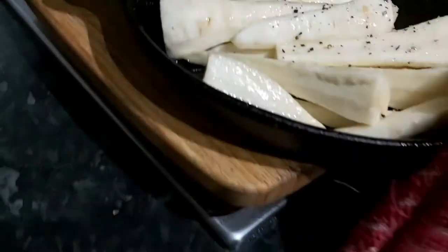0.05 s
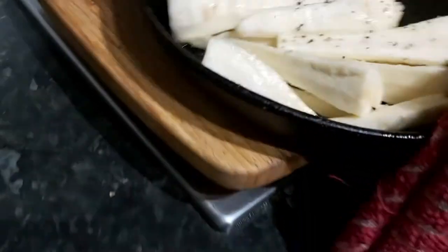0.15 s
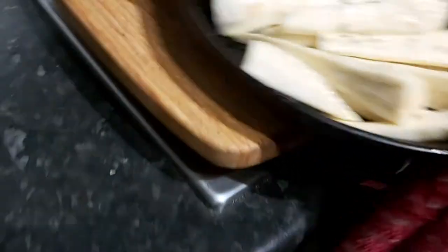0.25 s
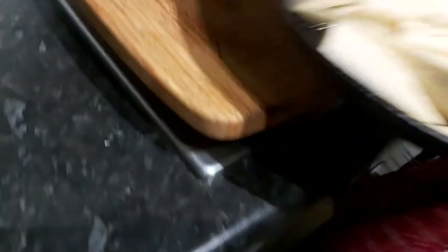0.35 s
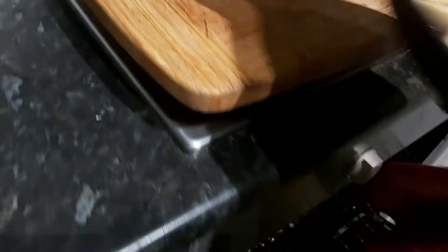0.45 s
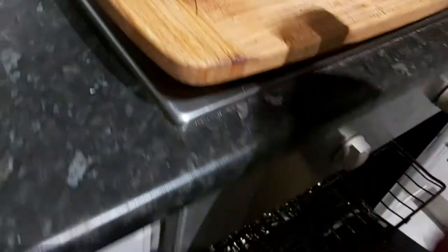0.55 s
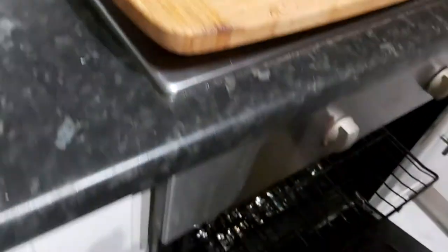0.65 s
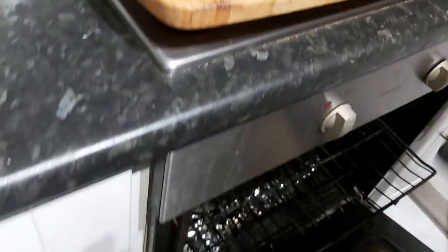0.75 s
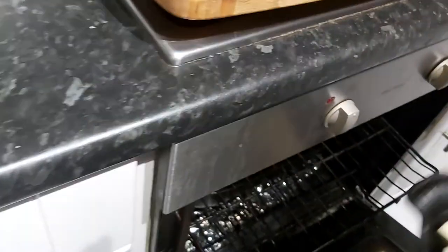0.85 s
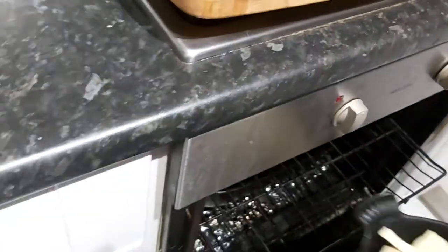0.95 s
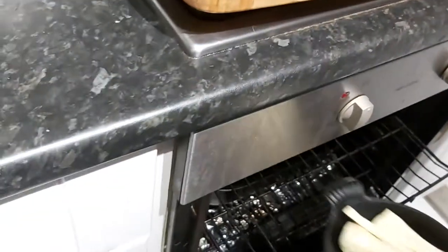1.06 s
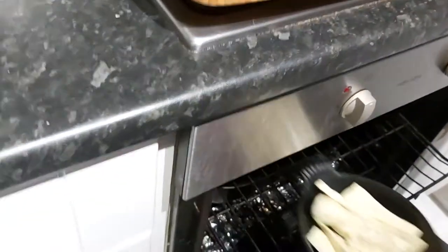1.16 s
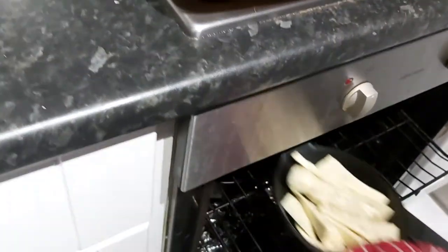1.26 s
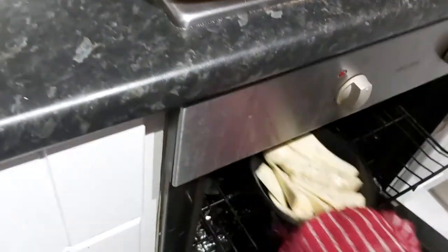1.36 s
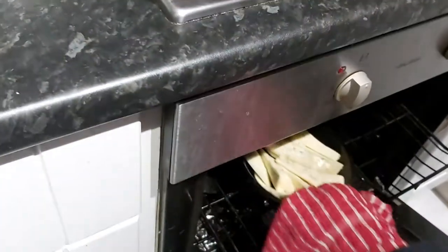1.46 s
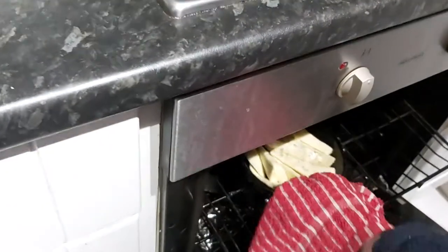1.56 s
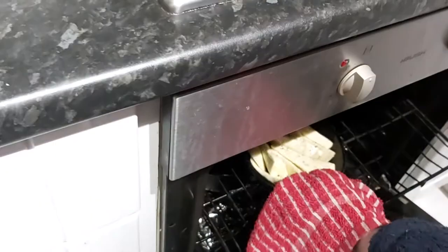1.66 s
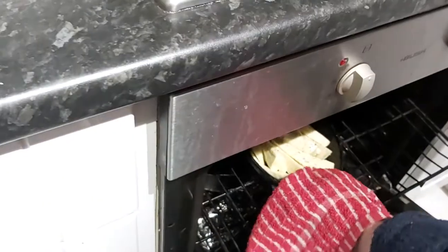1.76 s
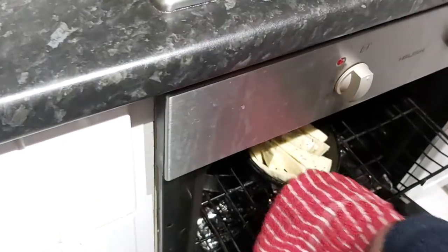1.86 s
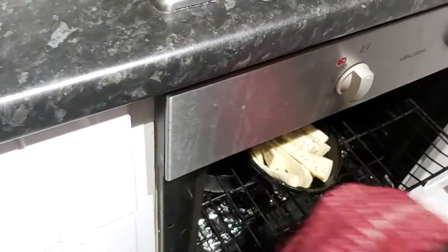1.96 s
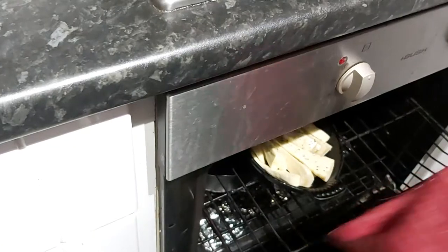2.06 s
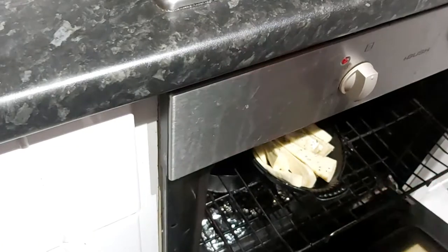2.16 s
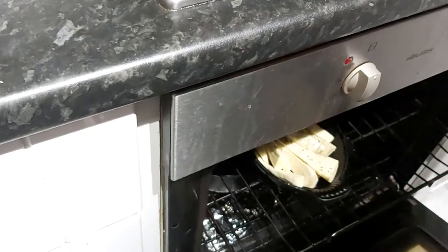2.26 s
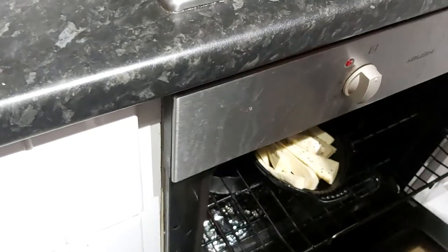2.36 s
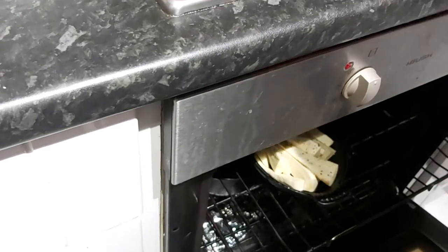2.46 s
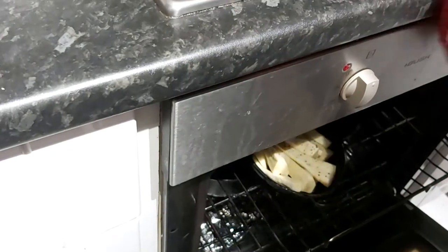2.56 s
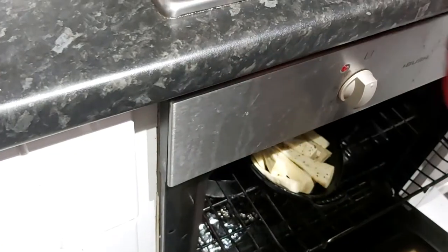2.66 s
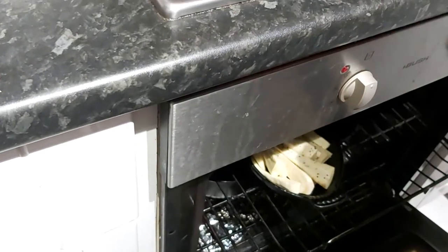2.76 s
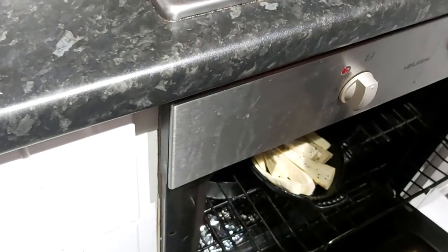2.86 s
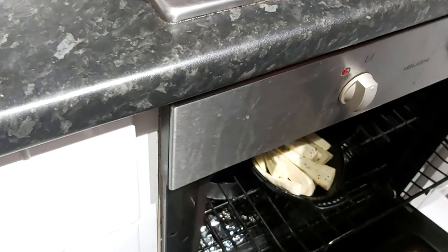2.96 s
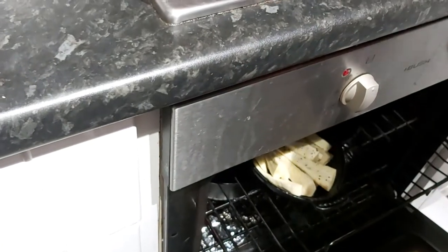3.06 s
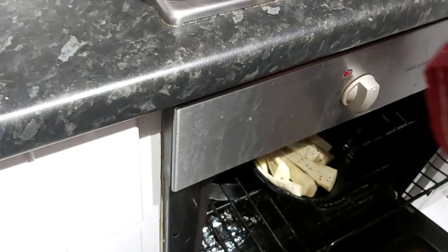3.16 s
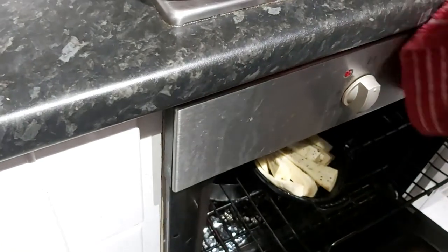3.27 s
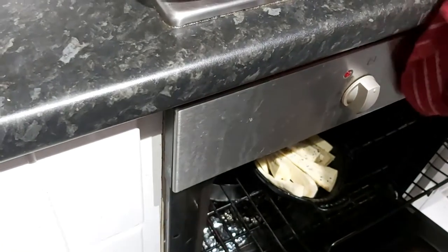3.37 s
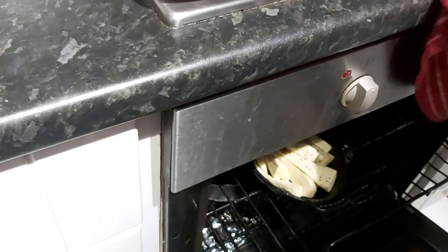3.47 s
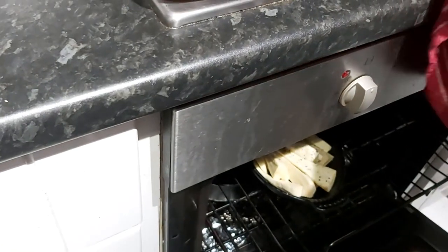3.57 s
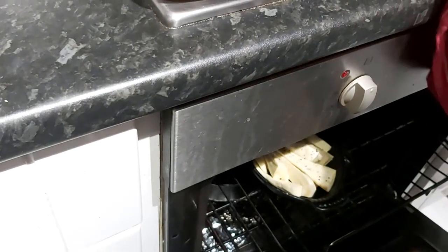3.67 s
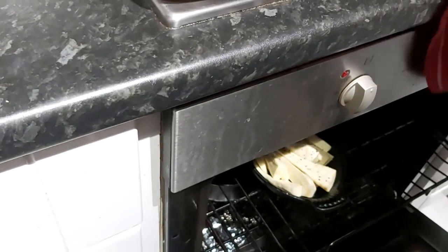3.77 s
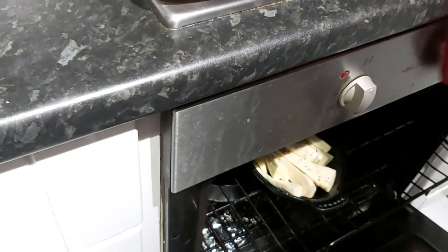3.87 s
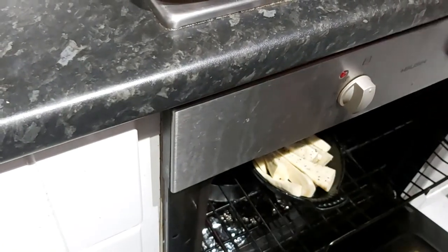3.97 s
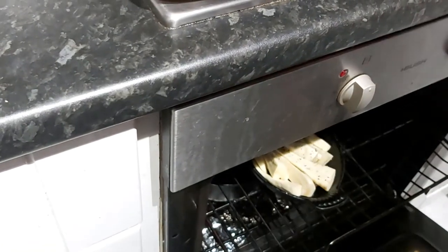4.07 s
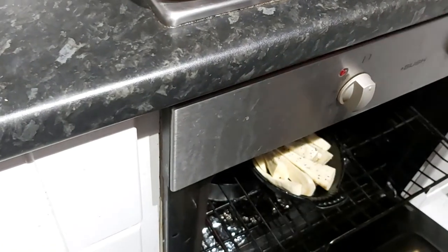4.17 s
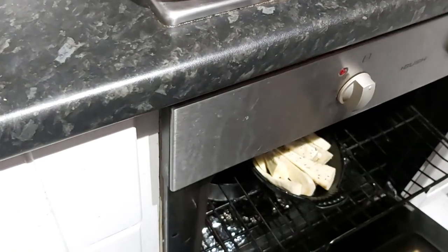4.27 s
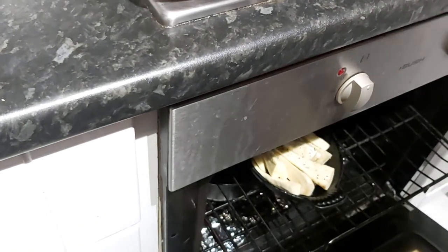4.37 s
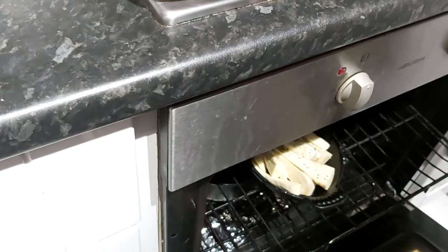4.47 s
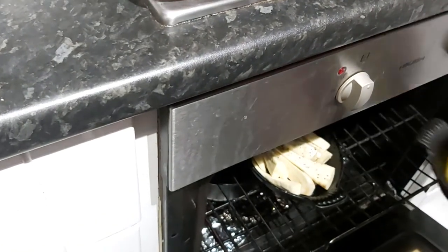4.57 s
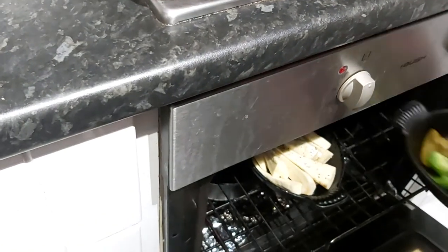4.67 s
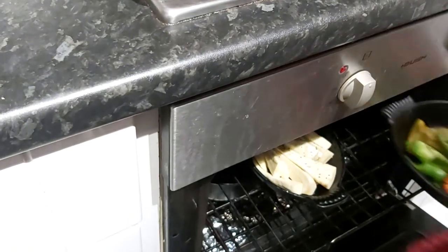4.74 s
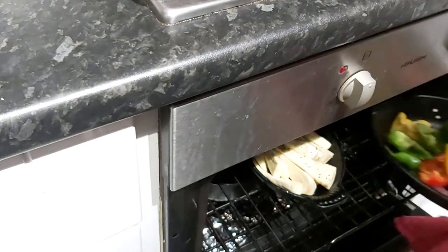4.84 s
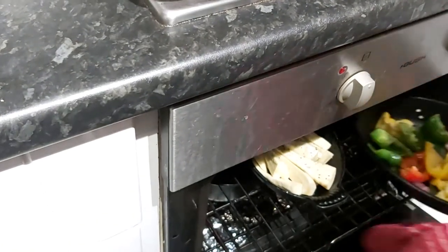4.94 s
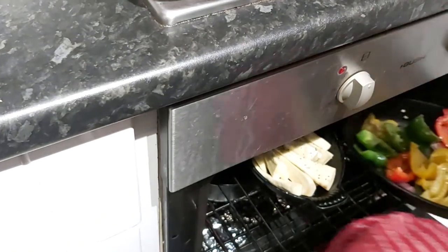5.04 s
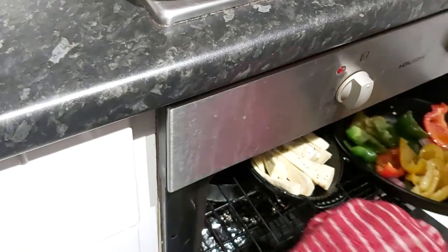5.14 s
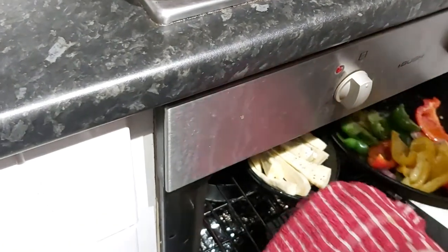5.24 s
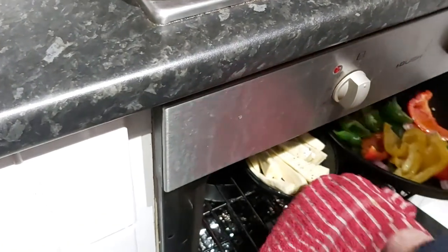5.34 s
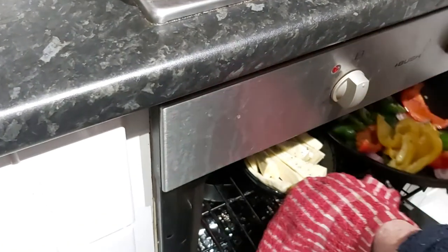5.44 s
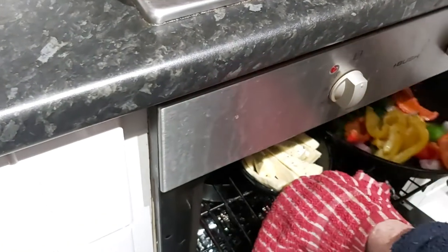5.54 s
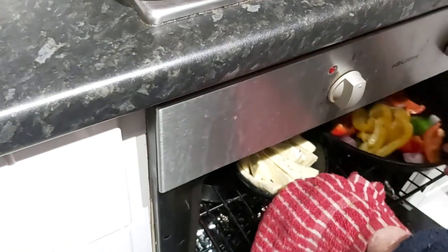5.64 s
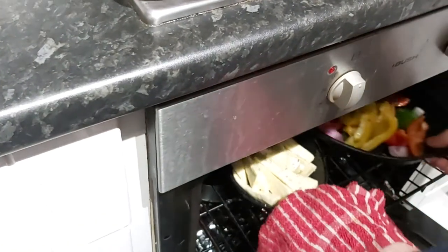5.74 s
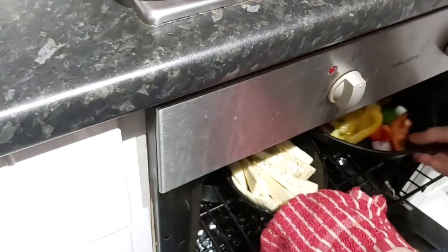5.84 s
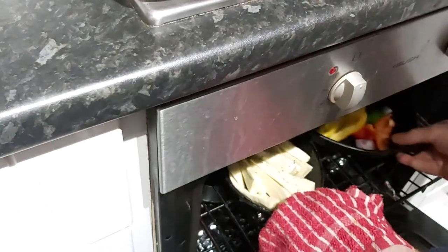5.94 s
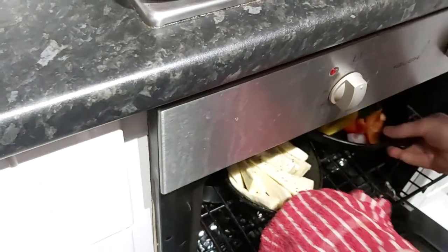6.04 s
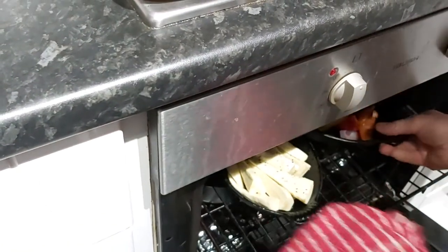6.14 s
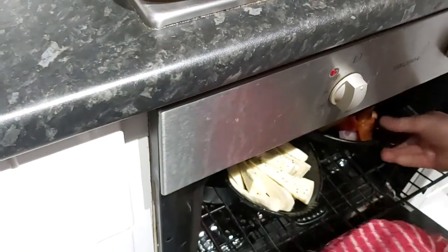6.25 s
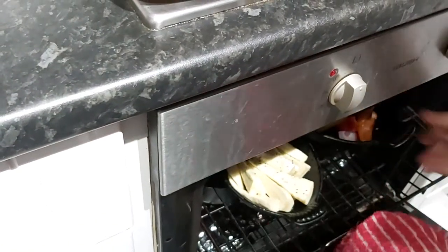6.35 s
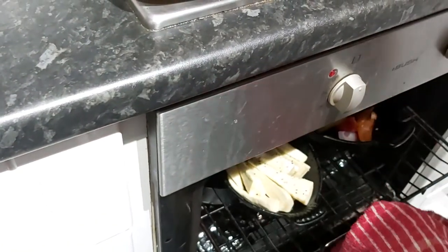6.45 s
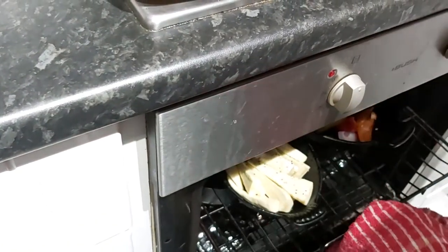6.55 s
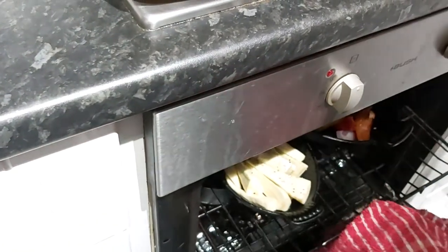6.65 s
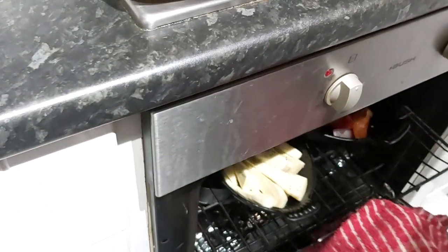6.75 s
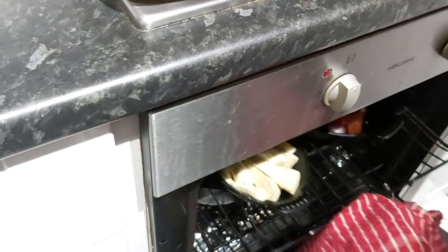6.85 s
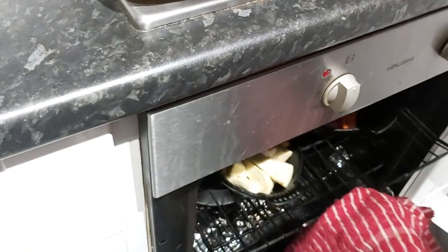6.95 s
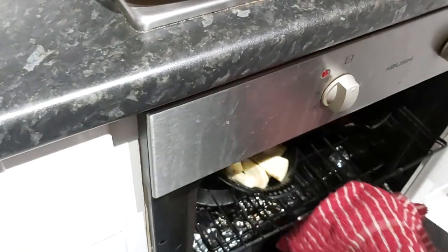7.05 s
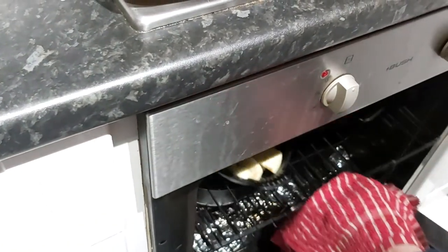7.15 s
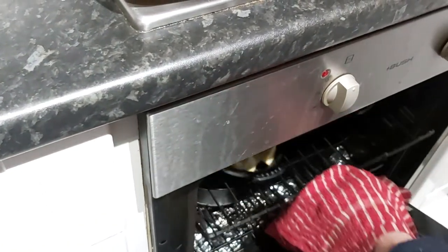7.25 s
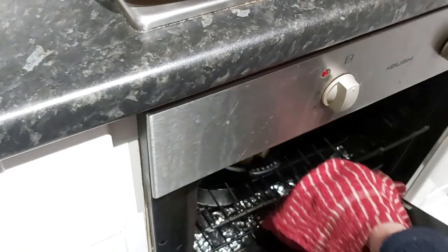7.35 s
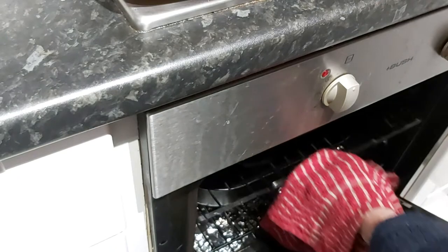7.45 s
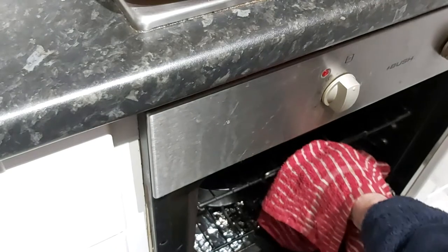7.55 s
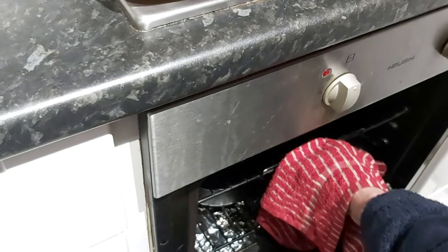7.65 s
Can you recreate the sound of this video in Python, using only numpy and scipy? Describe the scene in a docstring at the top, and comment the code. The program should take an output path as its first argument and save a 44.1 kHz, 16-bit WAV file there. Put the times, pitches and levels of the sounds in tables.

```python
"""A quiet kitchen hums while a pan stirs faintly on a wooden board; then iron pans slide onto a wire oven rack.
Rough noise and struck modes make the wires scrape, chatter and clank; the rack booms and some wires ring on.
Between them a second pan is dragged off the board, which drops back: noise through wood and panel modes.
A tea towel rustles as coloured noise; at the end the rack is pushed home against the oven wall."""
import sys
import numpy as np
from scipy import signal
from scipy.fft import rfft, irfft, next_fast_len
from scipy.io import wavfile
from scipy.ndimage import uniform_filter1d, map_coordinates

SR = 44100
rng = np.random.default_rng(int(sys.argv[2]) if len(sys.argv) > 2 else 0)


def dump(signal):
    """Clip the signal to [-1, 1] and save it as 16-bit WAV at the path in sys.argv[1]."""
    limited = np.clip(np.atleast_2d(signal).T, -1, 1)
    pcm = np.round(limited * 32767).astype(np.int16)
    wavfile.write(sys.argv[1], SR, pcm)


N = 339922

# Levels in dB are relative: each source adds its own offset.

# Kitchen hum and microphone hiss over time [time_s, hum_db, hiss_db]
HUM_LEVELS = [(0.0, -53.5, -77), (7.71, -67, -80)]
# Hum spectrum [freq_hz, gain_db]
HUM_COLOUR = [(18, -39), (30, 0.5), (58, -5), (70, -28.5), (86, -5), (108, -7.5), (168, -23.5), (247, -2),
              (266, -23.5), (303, -9.5), (415, -17), (672, -19), (794, -25.5), (1570, -34.5), (2500, -39),
              (3250, -54.5), (5500, -120)]
# Wavering tones of the hum [freq_hz, width_hz, gain_db]
DRONE_MODES = [(222, 11, -7), (247, 7, -1), (296, 5.4, -2.5)]
DRONE_DB = -6.5
# Hiss spectrum [freq_hz, gain_db]
HISS_COLOUR = [(880, -33.5), (1500, -5.5), (3180, -10), (3380, -9), (4120, -9), (7240, -1.5), (9370, -12.5),
               (13300, -13.5), (16000, -13.5)]
# Decay of the room's answer [freq_hz, t60_s]
KITCHEN_DECAY = [(150, 0.5), (1000, 0.3), (10000, 0.083)]

# Towel spectrum, also used for the rattle of thumps [freq_hz, gain_db]
CLOTH_COLOUR = [(1470, -27.5), (2500, 1.5), (4550, 0), (7470, -1.5), (8600, -5.5), (11900, -6),
                (15200, -10), (16000, -16)]
# Towel moving alone; the sharp one at 3.247 s is the rattle just after the board knocks
# [start_s, rise_s, hold_s, level_db]
RUSTLES = [(0.094, 0.036, 0.023, -67.5), (3.247, 0.0066, .04, -34.5), (3.378, 0.042, 0.24, -61.5),
           (3.597, 0.088, 0.15, -59)]
GRIP_DB, CLOTH_T60_S = -20, 0.24  # towel round the handle, against the rub
# One quick brush of cloth [start_s, rise_s, hold_s, level_db]
BRUSH_STROKE = (.69, .07, .115, -57)
BRUSH_T60_S = 0.17
# Brush spectrum [freq_hz, gain_db]
BRUSH_COLOUR = [(1760, -46), (3000, -20), (3310, -11.5), (7460, -1), (12300, -7), (16000, -11)]

# Pans moved on the board [start_s, rise_s, hold_s, rub_db, hob_panels_db, worktop_rumble_db]
RUBS = [(0, 0.00088, 0.02, -46, -41, -37.5), (0.057, 0.013, 0.11, -55.5, -47, -75),
        (0.199, 0.033, 0.0091, -45, -42, -61), (0.397, 0.1, 0.055, -76, -48, -64),
        (.58, 0.016, 0.044, -47.5, -52, -68), (0.735, 0.074, 0.1, -66.5, -48.5, -57),
        (1.0, 0.027, 0.18, -65.5, -60.5, -70), (1.437, 0.071, 0.085, -55, -62, -66.5),
        (2.844, .14, 0.12, -37, -41, -53.5), (2.978, 0.14, 0.096, -31.5, -41, -39.5),
        (3.277, 0.013, 0.025, -27.5, -37, -37), (3.517, 0.1, 0.033, -50, -51, -44.5),
        (3.617, 0.053, 0.22, -63.5, -57.5, -75.5)]
RUB_T60_S, HOB_T60_S, WORKTOP_T60_S = 0.25, 0.32, 0.44
# Iron on wood, distinct modes [freq_hz, width_hz, gain_db]
RUB_MODES = [(221, 230, -3), (610, 160, 2.5), (805, 17, -1), (1070, 49, -5.5), (1384, 64, -9.5),
             (1803, 93, -14.5), (2250, 180, -15.5), (2270, 35, -17.5), (2760, 40, -15.5), (3130, 47, -25.5),
             (3390, 19, -29)]
# Iron on wood, broad spectrum [freq_hz, gain_db]
RUB_COLOUR = [(180, -40), (300, -11.5), (453, -10.5), (547, -8.5), (997, -9), (1350, -11), (1520, -15),
              (2140, -18), (5000, -32.5), (6500, -71), (11000, -120)]
# Panels under the board [freq_hz, width_hz, gain_db]
HOB_MODES = [(177, 41, -10), (222.4, 15, 3.5), (313, 22, -2.5)]
# Worktop rumble [freq_hz, width_hz, gain_db]
WORKTOP_MODES = [(53, 47, -2.5), (95.5, 20, 1), (125, 14, -8)]
# Board knocking the hob; thumps() scales t60 per part [start_s, level_db, hollow_db, rattle_db, t60_s]
KNOCKS = [(0.143, -51, 1, -11, 0.15), (0.25, -39.5, -14, -36.5, 0.14), (0.591, -37, -29, -19, 0.3),
          (1.468, -49, -13, -28, 0.25), (1.496, -45, -12.5, -37, 0.18), (1.545, -45, -11.5, -30, .2),
          (3.2305, 3.5, -22.5, -39.5, 0.17), (3.252, -9, -7.5, -13.5, 0.23), (3.282, -16, 6, -16.5, 0.15),
          (3.31, -28.5, -0.5, -14, .2), (4.179, -61, -16, -9, 0.48)]
# Board plate [freq_hz, width_hz, gain_db]
BOARD_MODES = [(527, 85, -2), (618, 51, -10), (885, 45, -7.5), (1154, 26, -6), (1556, 20, -18.5),
               (2075, 45, -13), (2330, 25, -20.5), (2800, 28, -30.5)]
# Hollow under the board [freq_hz, width_hz, gain_db]
HOLLOW_MODES = [(127, 9, -2), (174, 9.6, -9), (250, 20, -12), (302, 23, 0), (515, 8, -15)]

# Rack meeting the oven wall; thumps() scales t60 per part [start_s, level_db, hollow_db, rattle_db, t60_s]
STOPS = [(7.5465, -4.5, -4.5, -24, 0.092), (7.554, -7, -5, -23, 0.1), (7.561, -13, -11, -25, .12),
         (7.567, -11.5, -8, -24.5, .15), (7.588, -10.5, -5.5, -28, 0.13), (7.609, -18, -8.5, -21.5, 0.51)]
# Oven wall [freq_hz, width_hz, gain_db]
WALL_MODES = [(426, 40, 4.5), (520, 51, 2), (620, 120, -3), (800, 60, 1), (873, 35, -2), (1080, 67, -6),
              (1150, 4.9, -10), (1273, 37, -3.5), (1542, 85, -13.5), (1956, 67.4, -13.5), (2240, 45, -21.5),
              (2490, 28, -27), (2670, 15, -18.5)]
# Oven cavity [freq_hz, width_hz, gain_db]
CAVITY_MODES = [(121.7, 14, 2), (169.9, 39, 2.5), (215, 32, 0)]

# Iron catching and singing as it drags [start_s, length_s, first_hz, last_hz, level_db]
SQUEAKS = [(0.224, 0.038, 1780, 1810, -51), (2.963, 0.14, 1103, 1150, -33.5), (3.05, 0.15, 1350, 1396, -29),
           (3.12, 0.085, 530, 608, -27), (2.895, .1, 205, 198.7, -36), (2.95, 0.14, 3110, 3144, -52),
           (3.06, 0.091, 2090, 2206, -43.5), (3.12, .11, 2740, 2800, -45), (7.44, 0.076, 2013, 2000, -36.5)]
# Something loose ticking on the hob [start_s, level_db, pitch_hz]
PINGS = [(3.274, -11, 2080), (3.4244, -46, 1770), (3.457, -37, 1780), (3.486, -47, 1810)]

# Free wires that ring on [pitch_hz, level_db, t60_s]
FREE_WIRES = [(183, -9, 1.2), (240, 3, 1.8), (301, -5, 2.5), (431, 0, 1.4), (497, -8, 1.1), (651, -5, 2.4),
              (738, -10, 1.1), (925, -9, 1.4), (1290, -4, 2.6), (2148, -3, .9), (3130, -10, .6),
              (3176, -9, .9)]
# Blows that leave wires free to ring [start_s, level_db, tilt_db_per_octave]
FREEING_BLOWS = [(1.922, -39, 0), (6.071, -58, -6)]
DAMPED_S, DAMPING_T60_S = 2.84, 0.15  # the first ring is cut short
WAVER_DB, WAVERS_PER_S = 2.8, 30

# Rack dropping over a step in its runners [start_s, level_db, pitch_hz]
BOUNCES = [(1.703, -22, 98.5), (1.738, -14, 100), (1.745, -17.5, 126.5), (1.918, -26, 105),
           (1.921, -16, 128.7), (5.103, -31, 105), (5.699, -25.5, 105), (5.7, -33, 210.7),
           (5.757, -25.5, 104.3), (5.961, -26, 104), (6.957, -18, 99.3), (7.014, -24, 101.3),
           (7.11, -26.5, 96), (7.205, -22, 109.6), (7.238, -25.5, 106.3), (7.29, -26, 107.4),
           (7.423, -32.5, 102), (7.552, -15, 124), (7.602, -34, 122)]
BOUNCE_WIDTH_HZ = 8
# Rack bouncing on its runners [freq_hz, width_hz, gain_db]
BOOM_MODES = [(94, 17, 7.5), (131, 9.2, 7), (61.4, 27, -12.5)]
# Oven sheets [freq_hz, width_hz, gain_db]
PANEL_MODES = [(209, 19, 3.5), (253, 4.3, 2), (294.5, 8, -1.5), (351, 29, -7)]
# Dense overtones of the oven sheets [freq_hz, gain_db]
PANEL_COLOUR = [(300, -26.5), (400, -9.5), (900, -17.5), (1400, -27), (2200, -54), (4000, -79.5)]
BOOM_T60_S, PANELS_T60_S = 0.53, 0.5
LOAD_LAG_S = 0.036  # the weight arrives late: longer rise, shorter hold
PANELS_DB, CLANK_PANELS_DB = -0.5, -25.5  # panels against the load; panels against a clank

# Iron pushed along the wires [start_s, rise_s, hold_s, scrape_db, grit_db, rack_load_db]
PUSHES = [(1.621, 0.018, 0.12, -33.5, -50, -28), (1.739, 0.026, 0.22, -34.5, -62, -29),
          (2.008, 0.015, 0.17, -40.5, -64.5, -34), (2.296, .1, 0.43, -89, -89.5, -50),
          (5.059, 0.0123, 0.049, -27.5, -43.5, -30.5), (5.161, 0.015, 0.11, -29, -49.5, -36),
          (5.296, 0.025, 0.17, -36, -51.5, -36.5), (5.455, 0.089, 0.17, -44.5, -53, -43),
          (5.657, 0.085, 0.14, -36, -45, -32), (5.886, 0.027, 0.21, -40.5, -51, -35),
          (6.205, 0.21, 0.35, -84, -90.5, -62.5), (6.758, .17, 0.024, -54, -59.5, -40),
          (6.944, 0.018, 0.28, -48, -56.5, -44.5), (7.157, .03, 0.12, -44.5, -46, -48),
          (7.328, 0.035, 0.1, -46.5, -48, -45.5), (7.424, 0.063, 0.066, -38.5, -40.5, -35.5),
          (7.547, .015, 0.041, -32.5, -40, -25)]
RISE_DB, SCRAPE_T60_S = 19.5, 0.28  # every stroke swells from RISE_DB below its level
SLIPS_PER_S, SLIP_SIZE, SLIP_DECAY_S = 45, 1.2, 0.005  # mean size against the even scrape; time constant
# Wires damped by the pan [freq_hz, width_hz, gain_db]
WIRE_MODES = [(470, 59, -4), (852.7, 19, 3.5), (1100, 166, -1.5), (1480, 40, 0.5), (1747.5, 40, 1),
              (2089, 78, -5.5), (2316, 51, -4.5), (2484, 15, -0.5), (2645, 22, -3), (2890, 26, -8.5),
              (3280, 55, -12), (3500, 120, -12.5), (4080, 30, -9.5), (4430, 20, -7), (4800, 75, -14),
              (5420, 23, -11.5), (6350, 27, -16), (6770, 45, -18.5), (7300, 29, -14.5), (7820, 36, -12),
              (8400, 29, -23)]
# Wire modes too close to tell apart [freq_hz, gain_db]
WIRE_COLOUR = [(100, -41), (170, -15.5), (216, -10), (392, -13), (435, -2.5), (560, -7.5), (838, -12),
               (2450, -11.5), (6000, -30), (7800, -45), (13200, -120)]
# Grit spectrum [freq_hz, gain_db]
GRIT_COLOUR = [(1760, -31.5), (3000, -6.5), (5800, -8), (6900, -7), (8760, -9.5), (15100, -15.5),
               (16000, -29)]
# Pan striking a wire; bright parts shorten t60 [start_s, level_db, sharpness_db, chatter_t60_s]
CLANKS = [(1.6184, -23.5, -2.5, .2), (1.627, -18.5, -12.5, .2), (1.6992, -24, -19, .18),
          (1.737, -7.5, -7.5, .15), (1.745, -8.5, -11.5, .24), (1.8905, -10, -37.5, .2),
          (1.902, -12, -16.5, .15), (1.9192, -3, -4.5, 0.2), (2.045, -15.5, -17, .18),
          (2.125, -16.5, -10.5, .2), (2.2108, -26, -12.5, .2), (5.025, -63, 8, 0.21),
          (5.0625, -25.5, 4, .25), (5.107, -21.5, -12, .15), (5.125, -20, -24.5, .15),
          (5.1505, -13.5, -40, 0.185), (5.190, -10.5, -8, 0.13), (5.196, -12.5, -10, .24),
          (5.3278, -17, -20, 0.17), (5.3775, -16, -8, 0.189), (5.7352, -32, -16, 0.2),
          (5.954, -12.5, -14.5, 0.16), (6.066, -16.5, -30, 0.143), (6.765, -60.5, 4.5, 0.21),
          (6.91, -40, -22, 0.26), (6.948, -28, -32, .18), (7.191, -29.5, -1.5, 0.12),
          (7.2759, -34, 1.5, 0.19), (7.378, -35, 1.5, .18), (7.425, -26.5, -14.5, 0.17),
          (7.459, -35, -5, 0.16), (7.5026, -31, 5.5, .18)]
CLANK_PAN_DB, PAN_SCATTER_DB = -2.5, 3  # left against right
SHEEN_HZ, SHEEN_GROWS, SHEEN_DB = 8200, 0.84, -1  # top treble follows sharpness by 1 + SHEEN_GROWS
CLANG_LOW_HZ, CLANG_HIGH_HZ, CLANG_WIDTH_HZ = 703.5, 9080, 28  # chance modes of each clank
CLANG_DB, CLANG_TILT_DB_PER_OCTAVE = -12, -0.5
CLANG_FOLLOWS = 0.46  # share of the sharpness

# Difference of the channels against their sum [freq_hz, gain_db]
SIDE_GAIN = [(60, -14.5), (130, -18.5), (250, -12), (500, -6), (1000, -2), (4000, 0), (15000, 0)]
# Left channel against right [freq_hz, difference_db]
LEAN = [(100, -1), (400, -2.5), (2000, -1), (6000, 2.5), (10000, -5)]
TOP_HZ = 15900


def amp(db):
    """Decibels to amplitude."""
    return 10 ** (np.asarray(db) / 20)


def unit(x):
    """Scale to rms 1."""
    return x / np.sqrt(np.mean(x ** 2) + 1e-20)


def along(points, hz):
    """Interpolate (Hz, value) points on a log-frequency axis."""
    f, v = np.transpose(points)
    return np.interp(np.log(hz + 1), np.log(f + 1), v)


def left_right(db):
    """Channel gains for a left-against-right difference."""
    return amp([[db / 2], [-db / 2]])


def gains(points):
    """One gain per sample for each dB column, linear in dB between points."""
    t = np.arange(N) / SR
    times, *columns = np.transpose(points)
    return [amp(np.interp(t, times, db, -150, -150)) for db in columns]


def wobble(rate, channels=1):
    """Smooth random curves through `rate` knots a second."""
    steps = np.arange(0, N + 32, 32)
    knots = rng.standard_normal((channels, int(N * rate / SR) + 4))
    curves = [map_coordinates(k, [steps * rate / SR]) for k in knots]
    return np.array([np.interp(np.arange(N), steps, curve) for curve in curves])


def filtered(x, response):
    """Apply a complex response of frequency."""
    size = next_fast_len(N + SR // 2)
    spectrum = rfft(x, size) * response(np.fft.rfftfreq(size, 1 / SR))
    return irfft(spectrum, size)[..., :N]


def modes(table):
    """Causal response of parallel resonances with alternating signs."""
    def response(f):
        total = 0
        for k, (centre, width, db) in enumerate(table):
            damping = 1j * f * width
            total = total + (-1) ** k * amp(db) * damping / (centre ** 2 - f ** 2 + damping)
        return total
    return response


def colour(points):
    """Minimum-phase response with the given gains, by folding the cepstrum."""
    def response(f):
        cepstrum = irfft(np.log(amp(along(points, f))))
        cepstrum[1:len(f) - 1] *= 2
        return np.exp(rfft(cepstrum[:len(f) - 1], 2 * len(f) - 2))
    return response


def above(hz):
    """Soft step from 0 to 1 round a frequency."""
    return lambda f: 1 / (1 + (hz / (f + 1)) ** 16)


def rough(rough_db, rate):
    """Stereo noise whose strength stumbles as small contacts come and go."""
    return rng.standard_normal((2, N)) * unit(amp(rough_db * wobble(rate)))


def body(force, response, rough_db=3, rate=60):
    """A force envelope on rough noise drives a body; force 1 gives rms 1."""
    def level_response(f):
        h = response(f)
        return h / np.sqrt(np.mean(np.abs(h) ** 2))
    return filtered(force * rough(rough_db, rate), level_response)


def strokes(start, rise, hold, db, t60):
    """Envelope of strokes: swell, hold, die away; overlaps add in power."""
    power, t = np.zeros(N + 2 * SR), np.arange(3 * SR // 2) / SR
    for s, up, on, level in zip(*np.broadcast_arrays(np.atleast_1d(start), rise, hold, db)):
        up, on = max(up, 0.001), max(on, 0)
        swell_db = -RISE_DB * np.maximum(1 - t / up, 0)
        fade_db = -60 * np.maximum(t - up - on, 0) / t60
        first = max(round(s * SR), 0)
        power[first:first + len(t)] += amp(level + swell_db + fade_db) ** 2 * np.minimum(2 * t / up, 1)
    return np.sqrt(power[:N])


def blows(times, db, t60, pan_db=0, rise=0.0019):
    """Envelope of blows: a quick rise, then dying chatter."""
    out, t = np.zeros((2, N + SR)), np.arange(SR // 2) / SR
    for s, level, life, pan in zip(*np.broadcast_arrays(times, db, t60, pan_db)):
        shape = amp(level - 60 * t / max(life, 0.01)) * (1 - np.exp(-t / rise))
        first = round(s * SR)
        out[:, first:first + len(t)] += shape * left_right(pan)
    return out[:, :N]


def struck(times, db, pan_db, table, scatter_db, size=SR // 5):
    """Each blow lands elsewhere: modes take new strengths and new phases in the two channels."""
    out, t = np.zeros((2, N + SR)), np.arange(size) / SR
    hz, width, level = np.transpose(table)[:, :, None]
    for s, peak, pan in zip(*np.broadcast_arrays(times, db, pan_db)):
        strength = amp(level + scatter_db * rng.standard_normal(hz.shape))
        decay = np.exp(-np.pi * width * t) * (1 - np.exp(-t / 0.00085)) ** 2
        phase = rng.normal(0, 1, (2, len(hz), 1)) * np.minimum(hz / 1500, 1.5)
        ring = (strength * decay * np.sin(2 * np.pi * hz * t + phase)).sum(axis=1)
        first = round(s * SR)
        out[:, first:first + size] += amp(peak) * left_right(pan) * ring / np.linalg.norm(amp(level))
    return out[:, :N]


def shifting(x, depth_db):
    """As the contact moves, patches of modes swell and fade."""
    z = signal.stft(x, nperseg=512)[2]
    field = rng.standard_normal(z.shape[1:])
    field = uniform_filter1d(field, size=2, axis=0)  # across frequency
    field = uniform_filter1d(field, size=9, axis=1)  # across time
    return signal.istft(z * unit(amp(depth_db * unit(field))), nperseg=512)[1][:, :N]


def hum():
    """Appliances drone to the right through narrow modes; the microphones hiss."""
    hum_gain, hiss_gain = gains(HUM_LEVELS)
    broad = body(hum_gain, colour(HUM_COLOUR), rough_db=4.5, rate=7.8)
    drone = amp(DRONE_DB) * body(hum_gain, modes(DRONE_MODES), rough_db=3, rate=5)
    hiss = body(hiss_gain, colour(HISS_COLOUR), rough_db=0, rate=10)
    return amp([[-3], [2.5]]) * (broad + drone + hiss)


def kitchen(x):
    """Room answer: noise in which each frequency dies at its own speed."""
    hz, t, z = signal.stft(rng.standard_normal((2, SR // 2)), SR, nperseg=256)
    fade = amp(-60 * t / along(KITCHEN_DECAY, hz)[:, None])
    tail = signal.istft(z * fade, SR, nperseg=256)[1]
    return signal.fftconvolve(x, tail / np.linalg.norm(tail[0]), axes=1)[:, :N]


def towel():
    """Soft noise on the right: cloth rustles with and between pan moves, a rattle after the knock, a bright brush."""
    *timing, rub_db = np.transpose(RUBS)[:4]
    gripped = strokes(*timing, rub_db + GRIP_DB, CLOTH_T60_S)
    separate = strokes(*np.transpose(RUSTLES), CLOTH_T60_S)
    rustle = body(np.hypot(gripped, separate), colour(CLOTH_COLOUR), rough_db=0.75, rate=60)
    brush = body(strokes(*BRUSH_STROKE, BRUSH_T60_S), colour(BRUSH_COLOUR), rough_db=1.2, rate=25)
    return amp([[-3], [2.5]]) * (rustle + brush)


def thumps(table, plate, hollow):
    """A heavy thing lands: plate, hollow and rattle each die at their own speed."""
    s, db, hollow_db, rattle_db, t60 = np.transpose(table)

    def plate_response(f):
        ringing = modes(plate)(f) / (1 + 1j * f / 3000) ** 2
        broad = 1j * f / (300 + 1j * f) / (1 - (f / 2400) ** 2 + 1.3j * f / 2400) ** 2
        return ringing + amp(-19) * broad

    contact = np.hypot(blows(s, db - 15, t60, rise=0.0059), blows(s, db - 3, 0.049, rise=0.0004))
    knock = body(contact, plate_response, rough_db=2.5, rate=110)
    knock += struck(s, db - 6, 0, plate, scatter_db=2.5)
    low = body(blows(s, db + hollow_db - 2.5, 0.87 * t60, rise=0.0039), modes(hollow))
    low += struck(s, db + hollow_db - 5, 0, hollow, scatter_db=0.5)
    chatter = blows(s + 0.001, db + rattle_db - 2.5, 0.75 * t60)
    rattle = body(chatter, colour(CLOTH_COLOUR), rough_db=1.5, rate=76)
    return knock + low + rattle


def board():
    """Iron rubs over wood, shaking the hob panels and the worktop; the board knocks the hob."""
    *timing, rub_db, hob_db, rumble_db = np.transpose(RUBS)
    rub = strokes(*timing, rub_db, RUB_T60_S)
    panels = strokes(*timing, hob_db, HOB_T60_S)
    rumble = strokes(*timing, rumble_db, WORKTOP_T60_S)
    iron = amp(-1.5) * body(rub, modes(RUB_MODES), rough_db=4)
    iron += amp(-3) * body(rub, colour(RUB_COLOUR), rough_db=0, rate=75)
    low = body(panels, modes(HOB_MODES), rough_db=3, rate=18)
    low += body(rumble, modes(WORKTOP_MODES), rough_db=1.5, rate=31)
    return shifting(iron, depth_db=4) + low + thumps(KNOCKS, BOARD_MODES, HOLLOW_MODES)


def oven_wall():
    """The rack stops against the wall: sheet modes over a low cavity."""
    return thumps(STOPS, WALL_MODES, CAVITY_MODES)


def squeaks():
    """Dragged iron sings in narrow wavering bands that glide; a loose thing ticks."""
    sing = np.zeros((2, N + SR))  # in phase, in quadrature
    for s, length, first_hz, last_hz, db in SQUEAKS:
        u = np.linspace(0, 1, round(length * SR))
        phase = 2 * np.pi * np.cumsum(first_hz + (last_hz - first_hz) * u) / SR
        first = round(s * SR)
        sing[:, first:first + len(u)] += amp(db) * np.sin(np.pi * u) * [np.sin(phase), np.cos(phase)]
    out = sing[0, :N] * (0.4 + 0.55 * wobble(120, channels=2))
    out += sing[1, :N] * 0.65 * wobble(120, channels=2)
    for s, db, hz in PINGS:
        out += struck([s], db, 0, [(hz, 85, 0)], scatter_db=5.5)
    return out


def free_wires():
    """Undamped wires ring on after a blow, each fluttering in level and phase."""
    t, out = np.arange(N) / SR, np.zeros((2, N))
    since = t - DAMPED_S
    damping_db = np.where(since < 2, -60 * np.maximum(since, 0) / DAMPING_T60_S, 0)  # lifts after 2 s
    for hz, db, t60 in FREE_WIRES:
        fade = 0
        for s, level, tilt_db in FREEING_BLOWS:
            start_db = level + db + tilt_db * np.log2(hz / 1000)
            fade = fade + (t > s) * amp(start_db - 60 * np.abs(t - s) / t60)
        phase = rng.normal(0, 0.59, (2, 1)) + 0.67 * wobble(WAVERS_PER_S)
        flutter = amp(damping_db + WAVER_DB * wobble(WAVERS_PER_S))
        out += fade * flutter * np.sin(2 * np.pi * hz * t + phase)
    return out


def rack_low(s, db):
    """The late load booms the rack and shakes the oven sheets; steps in the runners add thuds."""
    start, rise, hold, _, _, load_db = np.transpose(PUSHES)
    timing = start, rise + LOAD_LAG_S, hold - LOAD_LAG_S
    boom = strokes(*timing, load_db, BOOM_T60_S)
    pushed = strokes(*timing, load_db + PANELS_DB, PANELS_T60_S)
    panels = np.hypot(pushed, blows(s, db + CLANK_PANELS_DB, 0.37, rise=0.011))

    def panel_response(f):
        return modes(PANEL_MODES)(f) + colour(PANEL_COLOUR)(f)

    low = body(boom, modes(BOOM_MODES), rough_db=1.5, rate=24)
    low = low + body(panels, panel_response, rough_db=2.5, rate=21)
    for t, level, hz in BOUNCES:
        low += struck([t], level, 0, [(hz, BOUNCE_WIDTH_HZ, 0)], scatter_db=0)
    return low


def clang(times, db, pan_db, count):
    """Each clank wakes its own crowd of short metal modes at chance pitches."""
    out = np.zeros((2, N))
    for s, level, pan in zip(times, db, pan_db):
        hz = np.exp(rng.uniform(np.log(CLANG_LOW_HZ), np.log(CLANG_HIGH_HZ), count))
        width = np.full(count, CLANG_WIDTH_HZ)
        table = np.transpose([hz, width, CLANG_TILT_DB_PER_OCTAVE * np.log2(hz / 1000)])
        out += struck([s], level + CLANG_DB, pan, table, scatter_db=3, size=SR // 8)
    return out


def catch_and_slip():
    """The pan catches at random; each slip kicks the scrape and decays."""
    slips = (rng.random(N) < SLIPS_PER_S / SR) * rng.exponential(SLIP_SIZE, N)
    return unit(1 + signal.lfilter([1], [1, -np.exp(-1 / (SLIP_DECAY_S * SR))], slips))


def scraped_wires(s, db, sharp_db, chatter_t60, pan):
    """Sliding and chattering force the damped wires; grit and sheen carry the treble."""
    start, rise, hold, scrape_db, grit_db, _ = np.transpose(PUSHES)
    catching = catch_and_slip()
    scrape = catching * strokes(start, rise, hold, scrape_db, SCRAPE_T60_S)
    fizz = catching * strokes(start, rise, hold, grit_db, SCRAPE_T60_S)
    steep_db = db + (1 + SHEEN_GROWS) * sharp_db
    force = np.hypot(scrape, blows(s, db - 10.5, chatter_t60, pan, rise=0.004))
    grit = np.hypot(fizz, blows(s, db + sharp_db - 8, 0.95 * chatter_t60, pan))
    sheen = np.hypot(fizz, blows(s, steep_db - 10 + SHEEN_DB, 0.9 * chatter_t60, pan))

    def treble(f):
        return colour(GRIT_COLOUR)(f) + amp(0.5) * modes(WIRE_MODES)(f) * above(3500)(f)

    def grit_response(f):
        return treble(f) * (1 - above(SHEEN_HZ)(f))

    def sheen_response(f):
        return treble(f) * above(SHEEN_HZ)(f)

    wires = amp(-5) * body(force, modes(WIRE_MODES), rough_db=2, rate=90)
    wires += amp(-1) * body(force, colour(WIRE_COLOUR), rough_db=2, rate=45)
    wires += body(grit, grit_response, rough_db=1, rate=130)
    wires += amp(-2.5) * body(sheen, sheen_response, rough_db=0.5, rate=150)
    # first touch of metal: a short bright spit
    flash = blows(s, steep_db - 7, 0.026, pan - 4, rise=0.0008)
    return shifting(wires, depth_db=3.5) + body(flash, colour(GRIT_COLOUR), rough_db=1)


def rack():
    """Pushes and clanks drive wires, grit, boom and panels; some wires ring free."""
    s, db, sharp_db, chatter_t60 = np.transpose(CLANKS)
    pan = CLANK_PAN_DB + PAN_SCATTER_DB * rng.standard_normal(len(s))
    scraped = scraped_wires(s, db, sharp_db, chatter_t60, pan)
    clanks = clang(s, db + CLANG_FOLLOWS * sharp_db, pan, count=24)
    clanks += struck(s, db - 12.5, pan, WIRE_MODES, scatter_db=2.5)
    return rack_low(s, db) + free_wires() + clanks + scraped


def scene():
    """Mix; hum and towel stay out of the room's answer."""
    thuds = amp([[-1.2], [1.2]]) * (board() + oven_wall())
    near = thuds + squeaks() + rack()
    return hum() + amp(-8) * kitchen(near) + towel() + near


def record(dry):
    """Close ports hear long waves alike and lose deep bass; peaks round off at full scale; steep top limit."""
    mid = (dry[0] + dry[1]) / 2
    side = filtered((dry[0] - dry[1]) / 2, lambda f: amp(along(SIDE_GAIN, f)))

    def port_response(f):
        lean = amp(along(LEAN, f) * [[0.5], [-0.5]])
        return lean * (1j * f / (42 + 1j * f)) ** 4

    ports = filtered(np.array([mid + side, mid - side]), port_response)
    soft = ports / (1 + np.abs(ports) ** 10) ** (1 / 10)
    return filtered(soft, lambda f: f < TOP_HZ)


dry = scene()
out = record(dry)
dump(out)
```